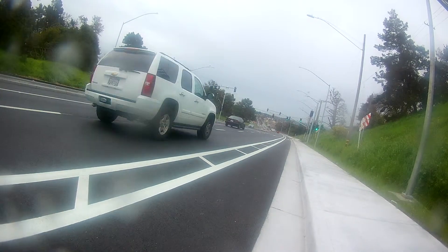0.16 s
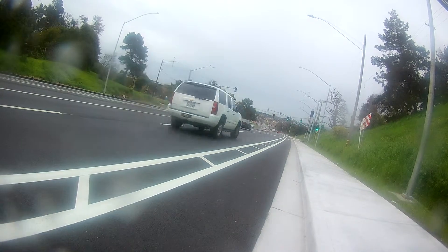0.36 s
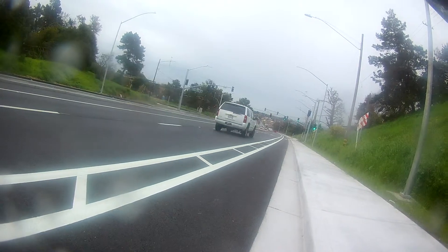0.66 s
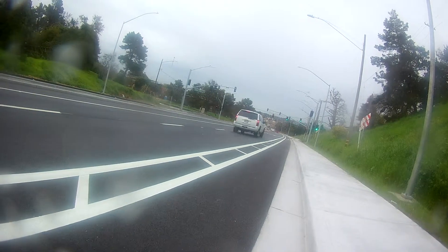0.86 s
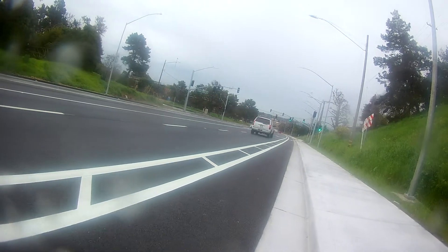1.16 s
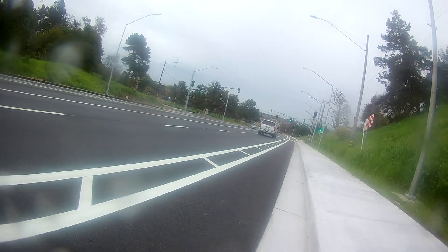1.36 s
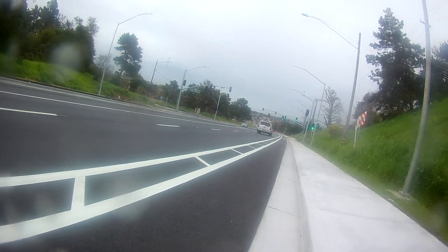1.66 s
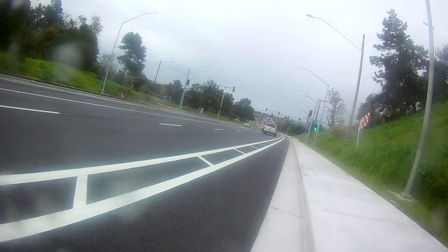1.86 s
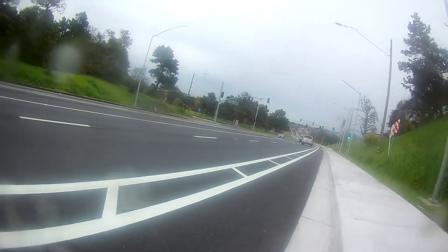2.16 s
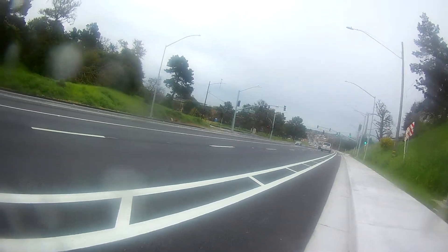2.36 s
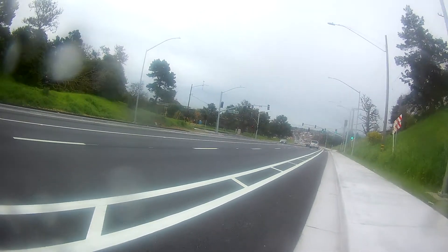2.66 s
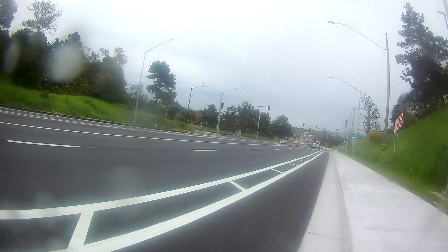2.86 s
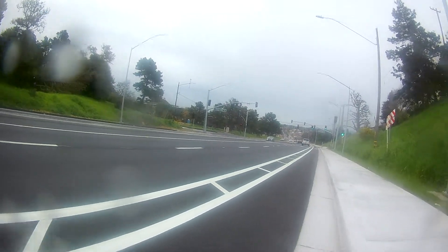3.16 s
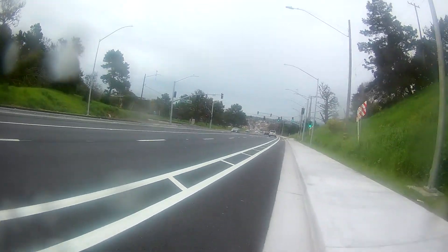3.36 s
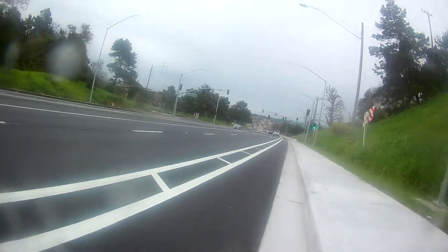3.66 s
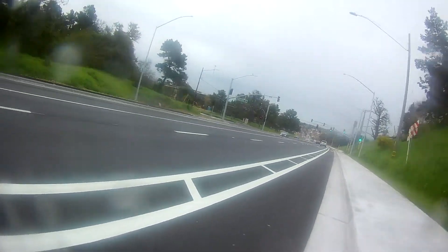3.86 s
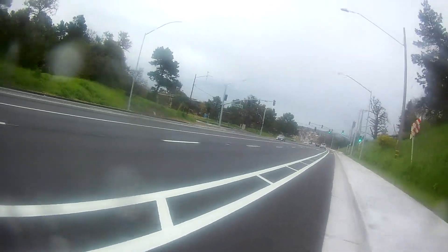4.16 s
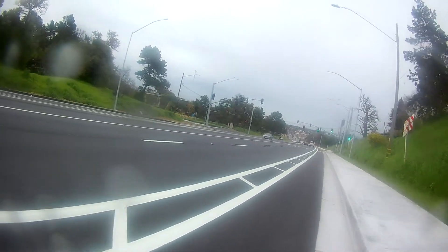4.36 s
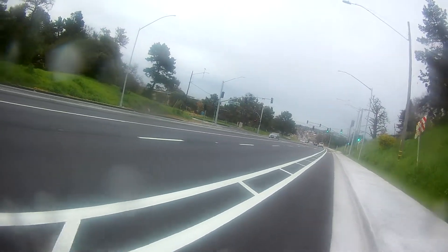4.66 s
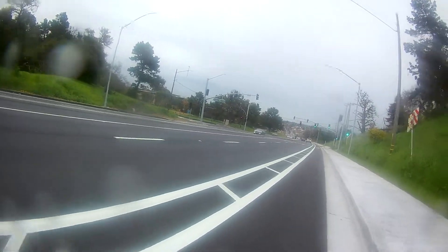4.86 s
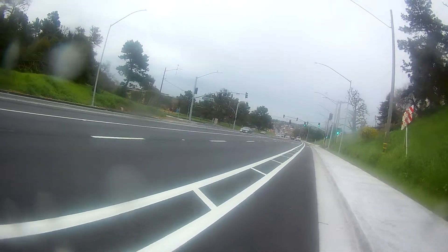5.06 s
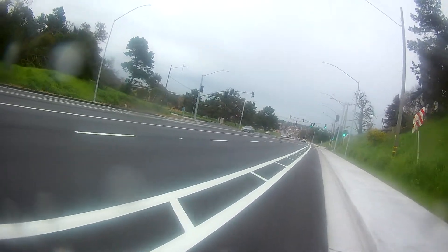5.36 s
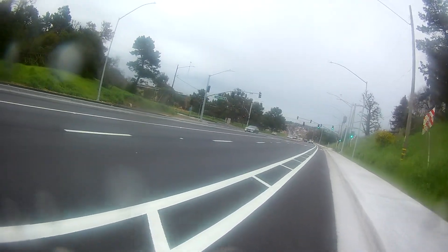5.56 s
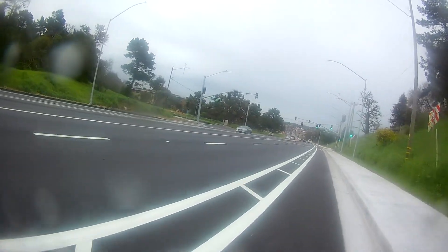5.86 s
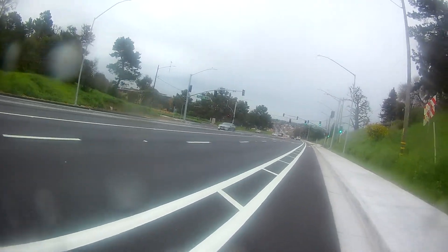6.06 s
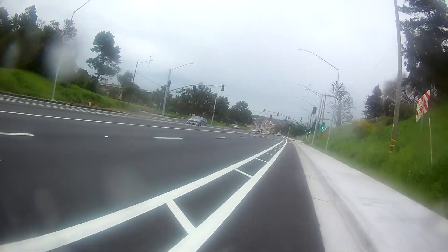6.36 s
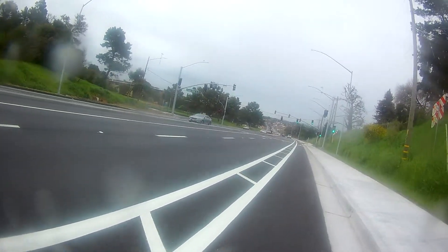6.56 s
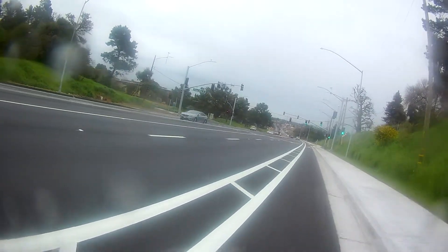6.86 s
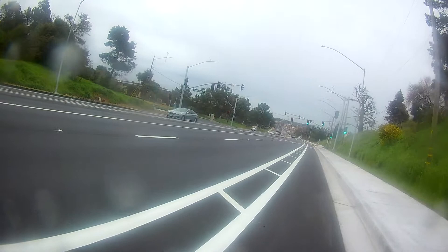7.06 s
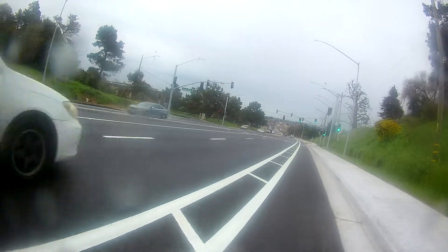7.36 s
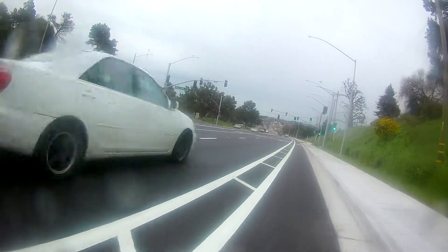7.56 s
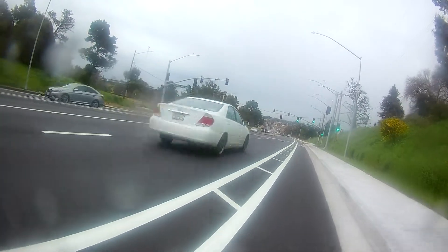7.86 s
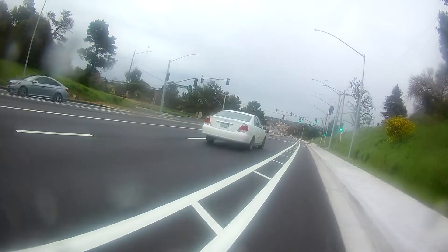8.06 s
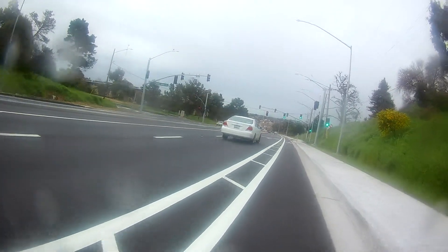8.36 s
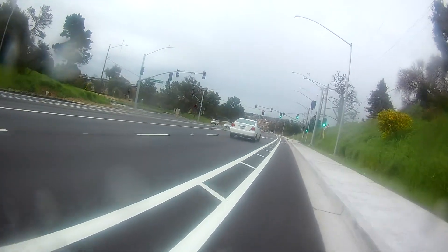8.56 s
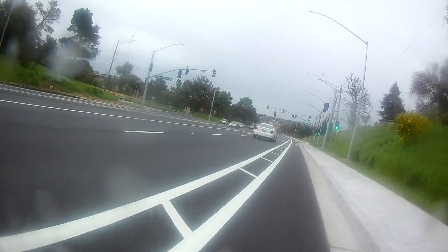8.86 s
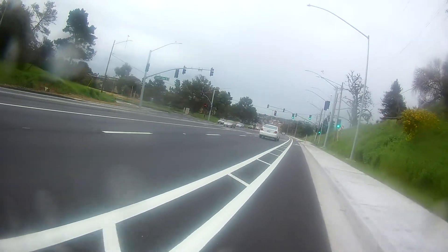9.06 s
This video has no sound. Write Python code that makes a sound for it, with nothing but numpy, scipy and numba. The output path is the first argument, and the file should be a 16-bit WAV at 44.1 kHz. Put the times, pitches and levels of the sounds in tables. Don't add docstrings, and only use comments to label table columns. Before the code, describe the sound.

Close, boxy microphone sealed in a plastic case on a bicycle. First the muffled hiss and roar of a passing car draws away. At about one and a half seconds a sharp clack dominates, followed by small knocks and rattles. Low frame rumble builds over rough road with buffeting wind; later another car's tyre whoosh swells, passes and recedes.

```python
import sys
import numpy as np
from scipy import signal
from scipy.fft import rfft, irfft, next_fast_len
from scipy.io import wavfile
from scipy.ndimage import uniform_filter1d
from numba import njit

SR = 44100
rng = np.random.default_rng(int(sys.argv[2]) if len(sys.argv) > 2 else 0)


def log_audio(samples):
    frames = np.atleast_2d(samples).T
    limited = np.clip(frames, -1, 1)
    pcm = np.round(limited * 32767).astype(np.int16)
    wavfile.write(sys.argv[1], SR, pcm)


def voltage_ratio(level):
    return 10 ** (np.asarray(level, float) / 20)


N = 405719
TIME = np.arange(N) / SR
SLOW = TIME[::64]


def level(x, db):
    return x * voltage_ratio(db) / np.sqrt(np.mean(x ** 2))


def curves(table):
    s, *columns = np.transpose(table)
    return [np.interp(SLOW, s, c) for c in columns]


def full(slow):
    return np.interp(TIME, SLOW, slow)


def walk(rate):
    hold = int(SR / rate)
    steps = np.repeat(rng.standard_normal(N // hold + 1), hold)
    return 1.3 * uniform_filter1d(uniform_filter1d(steps, hold), hold)[:N]


def coloured(spectrum):
    hz, db = np.transpose(spectrum)
    size = next_fast_len(N)
    log_hz = np.log(np.maximum(np.fft.rfftfreq(size, 1 / SR), 1))
    gain = voltage_ratio(np.interp(log_hz, np.log(hz), db, left=-99, right=-99))
    return level(irfft(rfft(rng.standard_normal(size)) * gain, size)[:N], 0)


@njit
def svf(x, hz, width):
    y, band, low = np.empty(len(x)), 0., 0.
    for i in range(len(x)):
        g, k = np.tan(np.pi * hz[i] / SR), width / hz[i]
        v = (band + g * (x[i] - low)) / (1 + g * (g + k))
        band, low, y[i] = 2 * v - band, low + 2 * g * v, k * v
    return y


def rings(modes, t, turn=0):
    hz, width, db = np.transpose(modes)[:, :, None]
    return voltage_ratio(db) * np.sin(2 * np.pi * (hz * t + turn)) * np.exp(-np.pi * width * t)


def onset(t, rise):
    return np.sin(np.pi / 2 * np.clip(t / np.clip(rise, .001, .03), 0, 1)) ** 2


def add(out, s, x, db):
    i = int(s * SR)
    x = x[:N - i]
    out[i:i + len(x)] += x * voltage_ratio(db) / np.abs(x).max()


# (time alongside [s], level [dB], closing speed [m/s], lane distance [m])
CARS = [
    (-.17, 2, 19.6, 3.6),
    (7.25, -0.4, 16.17, 3.36),
]


def passing(db, ahead_m, coming, going, shadow_db, colour_db=(0, 0), fade_db=0.75):
    power = 0
    for (s, car_db, speed, lane), tint_db in zip(CARS, colour_db):
        along = speed * (SLOW - s)
        decades = np.log10(np.hypot((along - ahead_m) / lane, 1))
        shadow = (1 + np.tanh((along - 7.6) / 1.3)) / 2
        loss_db = np.where(along < ahead_m, coming, going) * decades
        loss_db = loss_db + shadow_db * shadow + fade_db * np.maximum(along, 0)
        power = power + voltage_ratio(db + car_db + tint_db - loss_db) ** 2
    return np.sqrt(power)


# (frequency [Hz], level [dB per Hz])
ROAR_SPECTRUM = [(150, -33), (250, -6.5), (346, -8), (424, -9), (488, -15), (571, -6.5), (639, -9.5),
                 (821, -7), (1080, -5), (1380, 1.5), (1500, 5.5), (1790, 0), (2000, -8), (2180, -15.5),
                 (2300, -50), (2990, -52), (5060, -120)]
EDGE_SPECTRUM = [(1500, -28), (2000, -9), (2150, -2), (2320, 2), (2450, -2.5), (2600, -7), (2850, -12.5),
                 (2960, -22), (3300, -41)]
HISS_SPECTRUM = [(1590, -34), (2700, -6), (2870, -5), (3010, -4.5), (3210, 3.5), (3450, 0.5), (3560, -3),
                 (3800, 0), (3990, -1), (4210, -0.5), (4380, -25), (4600, -22), (5980, -51), (10100, -120)]
SPRAY_SPECTRUM = [(3600, -34), (4150, -11), (4350, -3), (4650, -2.5), (5000, -6.5), (5250, -13),
                  (5500, -14), (6500, -46)]
MIST_SPECTRUM = [(4700, -30), (5050, 1), (5500, -6), (5990, -1), (6300, -7), (6750, -1), (7300, -6),
                 (9000, -39)]
LIP_SPECTRUM = [(1700, -31), (1850, -1.5), (1960, 3), (2060, 0), (2150, -18), (2300, -42)]
# (level alongside [dB], loudest distance ahead [m], loss coming [dB per decade],
# loss going [dB per decade], loss in the shadow of the lens port [dB])
WALL_LAWS = [
    (-39.5, 0.7, 22.5, 8.5, 5.5),
    (-55.5, 2.5, 35, 12, 9.5),
    (-61.5, 5.5, 27.5, 12, -1),
    (-75.5, 2.3, 24.5, 12, 1),
    (-85, 5, 14.5, 8, 0),
    (-52.5, -2.5, 21, 16, 5),
]
# (roar [dB], edge [dB], hiss [dB], spray [dB], mist [dB], lip [dB])
CAR_TINT = [
    (0, 2, 0.1, 3, 5.5, -1),
    (-0.046, 1.5, 1, 0.11, 2, -0.5),
]
WALL_FADE = [0.44, 0.47, 0.22, 0.47, .4, .4]
FAR_LEVELS = [-64, -84.5, -81.5, -93, -99, -78]
# (time [s], swell [dB], swell of the wet hiss [dB])
FAR_SWELLS = [(0, -7, 0), (1.0, 2.5, 6), (1.8, -4, 4.5), (2.2, 3.5, -1), (2.7, 6, 1), (3.2, 4.5, 1),
              (3.6, 0.5, 0.5), (4.0, 1.5, 1.2), (4.4, -2, 2), (5.1, -5, 2.5), (6.0, -15, -1), (8, -0.5, -3),
              (9.2, 5, 6)]
FAR_SHARES = [
    (1.07, 0.043),
    (0.12, 0.8),
    (0.041, 1.0),
    (0.1, .8),
    (0.078, .5),
    (1.2, 0),
]


def wall_leak():
    swell = .4 * walk(3.3)
    far_db = np.array(FAR_SHARES) @ curves(FAR_SWELLS) + np.c_[FAR_LEVELS]
    walls = ROAR_SPECTRUM, EDGE_SPECTRUM, HISS_SPECTRUM, SPRAY_SPECTRUM, MIST_SPECTRUM, LIP_SPECTRUM
    roar = np.zeros(N)
    for wall, law, tint, fade, db in zip(walls, WALL_LAWS, np.transpose(CAR_TINT), WALL_FADE, far_db):
        near_and_far = np.hypot(passing(*law, tint, fade), voltage_ratio(db))
        roar += coloured(wall) * full(near_and_far) * voltage_ratio(swell + 0.96 * walk(20))
    return roar


# (time [s], centre [Hz], depth [0-1])
ROAD_MIRROR = [(0, 1300, 0.53), (1.0, 1420, 0.5), (2.2, 1510, 0.54), (2.5, 1570, 1), (2.9, 1480, 0.8),
               (3.3, 1340, 0.4), (3.7, 1210, 0.2), (4.3, 1300, 0.1), (5.4, 1290, 0.7), (6.2, 1150, 0.3),
               (7.0, 1140, 0.5), (8.0, 1240, 0.64), (9.2, 1350, 1)]


def mirrored(roar):
    hz, depth = map(full, curves(ROAD_MIRROR))
    return roar - np.clip(depth, 0, 1) * svf(roar, hz, 370.0)


# (level alongside [dB], loudest distance ahead [m], loss coming [dB per decade],
# loss going [dB per decade], loss in the shadow [dB])
TREAD_LAW = (-50, -3, 22.5, 10, 12.5)


def tread():
    width_hz, turn_m = 167.0, 6.2
    s, _, speed, _ = CARS[-1]
    along = np.where(SLOW < s / 3, turn_m, speed * (SLOW - s))
    hz = full(1752 * (1 - 0.078 * along / np.hypot(along, turn_m)))
    whine = svf(svf(rng.standard_normal(N), hz, width_hz), hz, 1.6 * width_hz)
    return level(whine, 0) * full(passing(*TREAD_LAW))


# (frequency [Hz], width [Hz], level [dB])
WALL_MODES = [(1086, 85, -6), (1786, 54, 0), (3180, 170, -12.5), (3840, 80, -11), (4110, 90, -5.5)]


def traffic():
    roar = mirrored(wall_leak()) + tread()
    ringing = sum(voltage_ratio(db) * svf(roar, np.full(N, 1. * hz), 1. * width) for hz, width, db in WALL_MODES)
    return roar + ringing


# (frequency [Hz], level [dB per Hz])
SEAM_SPECTRUM = [(2400, -32), (2600, -12), (2780, -2), (2900, -11), (3050, -3), (3180, -11), (3350, -7),
                 (3500, -31), (4200, -32), (4380, -17), (4550, -15), (4800, -40)]
# (time [s], level [dB])
SEAM_LEVEL = [(0, -96.5), (1.8, -93), (2.5, -85), (4, -84), (6, -82.5), (6.9, -78), (7.2, -69), (7.45, -73),
              (7.6, -90), (9.2, -90)]


def seam():
    return coloured(SEAM_SPECTRUM) * voltage_ratio(full(curves(SEAM_LEVEL)[0]) + .7 * walk(12))


# (time [s], pace [0-1], coarseness of the surface [dB])
RIDE = [(0, 0.17, 6.5), (.5, 0, 0.5), (1.0, 0.1, -1), (1.5, 0.6, 1.5), (1.85, 0.16, -1.5), (2.2, 0.46, 2.5),
        (2.6, 0.08, -2), (3.1, 0.61, -1), (3.6, 0.59, -1.5), (4.0, 0.68, 1), (4.2, 0.91, 2), (5.0, 0.83, 1),
        (5.5, 0.87, 1.5), (6.5, 0.94, 3.5), (7.1, 0.96, 3), (7.6, 0.88, 5.5), (8.2, 1, 6.5), (8.7, 1, 7.5),
        (9.2, 0.99, 8)]
# (level at rest [dB], gain at full pace [dB], level from a car alongside [dB],
# share of a bump [1], share of coarseness [1])
PART_SHAKE = [
    (-73.5, 28.5, -83.5, 0.64, -0.1),
    (-67.5, 17, -56, 0.087, 0.14),
    (-71.5, 16, -74, 0.39, 0.5),
    (-61.5, 4.5, -51.5, 0.095, 0.93),
]
# (time [s], swell [dB], length [s], extra on the bars [dB])
ROAD_BUMPS = [(2.153, -8, 0.09, 8.5), (2.956, 13, 0.03, -6), (3.162, 6.5, 0.07, 3.5), (3.48, 3, 0.056, 5.5),
              (3.81, 19, 0.22, -4.5), (4.152, 3, 0.057, 10), (5.027, 12, 0.031, -1),
              (5.244, 15.5, 0.03, -4.5), (5.463, 10, 0.097, -1.5), (5.872, 12.5, 0.043, -6),
              (6.288, 13, 0.052, -5.5), (6.58, -3, 0.15, 0), (6.857, 9, 0.043, 0.5), (7.05, -1, 0.084, 2),
              (7.98, 5, 0.029, -6), (8.482, 7, 0.026, -4.5), (8.863, 4, 0.064, -2.5), (9.053, -5.5, 0.2, 6)]


def shaking():
    s, db, length, bars_db = np.transpose(ROAD_BUMPS)[:, :, None]
    patch = np.exp(-((SLOW - s) / length) ** 2)
    swell, bars_extra = (db * patch).sum(axis=0), (bars_db * patch).sum(axis=0)
    pace, coarse = curves(RIDE)
    rumble = passing(0, 6.9, 45, 5.9, 1.2)
    gains = []
    for rest, span, car, bump, grit in PART_SHAKE:
        road = voltage_ratio(rest + span * pace + bump * swell + grit * coarse)
        gains.append(np.hypot(road, voltage_ratio(car) * rumble))
    gains[2] = gains[2] * voltage_ratio(bars_extra)
    return [full(g) for g in gains]


def shaken(modes, grain, flicker_db, rate):
    t = TIME[:SR // 6]
    soft = 1 - np.exp(-t / 0.0007)
    uptake = np.array(modes)[:, 1:2] ** 0.16
    out = np.zeros(N)
    for push in rings(modes, t) * soft * uptake:
        flicker = voltage_ratio(flicker_db * walk(rate))
        out += flicker * signal.oaconvolve(grain * rng.standard_normal(N), push)[:N]
    return level(out, 0)


# (time [s], frequency [Hz])
FRAME_SWAY = [(0, 75.5), (3.55, 78), (3.65, 98), (3.92, 98), (4.02, 74), (5.3, 75.7), (5.5, 81),
              (6.2, 76.3), (8, 82.6), (9.2, 73)]
# (frequency [Hz], width [Hz], level [dB])
FORK_MODES = [
    (128.6, 35, -1.5),
    (156.9, 15.6, -1.5),
]
BARS_MODES = [
    (180, 24, -16),
    (218, 14.3, 0.5),
    (251, 18, -6),
]
CASE_MODES = [(386, 29.7, -6), (476, 37, -9), (514.3, 45.4, -3.5), (625.3, 9.8, -8.5), (689, 69, 1.5),
              (797, 19.4, -9), (907, 146, 5), (1080, 79, -2.5), (1318, 78, -6), (1550, 27, -17.5),
              (1860, 68, -20), (2170, 190, -26)]
# (time [s], pressure on the lid [dB])
WIND_PRESSURE = [(0, -74), (1, -74), (1.8, -77), (2.1, -70), (2.6, -73), (2.95, -59.5), (3.3, -69.5),
                 (4.3, -60.5), (4.6, -66), (4.9, -78), (5.3, -78), (5.8, -73), (6.3, -60.5), (6.8, -72),
                 (7.6, -64), (8.6, -64), (9.2, -64)]


def rolling():
    grain = voltage_ratio(1.03 * walk(18) + 0.96 * walk(90))
    sway_hz = full(curves(FRAME_SWAY)[0])
    sway = svf(svf(grain * rng.standard_normal(N), sway_hz, 35.0), sway_hz, 49.0)
    fork = shaken(FORK_MODES, grain, flicker_db=2.5, rate=4.3)
    bars = shaken(BARS_MODES, grain, flicker_db=0.0, rate=6)
    buzz = shaken(CASE_MODES, grain, flicker_db=-0.1, rate=11)
    parts = level(sway, 0), fork, bars, buzz
    ride = sum(part * gain for part, gain in zip(parts, shaking()))
    wind = coloured([(5, -4.0), (16, -0.5), (27, -3), (40, -12.0), (70, -15.5), (130, -17.5), (300, -45.0)])
    return ride + wind * voltage_ratio(full(curves(WIND_PRESSURE)[0]) + 9.0 + 1.5 * walk(10))


# (time [s], peak level [dB], frequency [Hz], rise [s], ring down to -60 dB [s])
SOFT_NUDGES = [(1.108, -34, 204, 0.0047, 0.051), (1.158, -45, 1890, .002, .02),
               (1.1645, -50, 2170, .002, .015), (1.425, -24.5, 560, 0.0024, 0.053),
               (2.008, -40, 470, 0.0026, .08), (2.152, -40, 470, .005, .12), (2.254, -30, 693, .006, .04),
               (2.3, -46.5, 640, .006, 0.12), (2.689, -45, 692, .006, 0.077), (2.734, -41, 24, 0.0089, .4),
               (2.832, -32, 700, .011, .03), (2.85, -40.5, 578, 0.0047, 0.057),
               (2.862, -45, 646, .006, 0.11), (3.181, -40, 648, .001, .03), (4.1, -46, 690, 0.0089, 0.11),
               (4.125, -35, 518, 0.005, .05), (4.143, -39, 202, 0.0069, .08),
               (4.159, -36, 660, 0.0052, .05), (4.162, -39, 229, .008, 0.11), (4.176, -41, 630, 0.0088, .1),
               (8.929, -38, 900, .001, .03), (2.02, -31, 77, .016, .13), (2.032, -38, 470, .006, .06),
               (2.036, -43, 1090, .008, .04), (2.2, -45, 1130, .002, .04), (2.2465, -27, 1130, .004, .025),
               (2.495, -45, 180, .008, .1), (2.686, -41, 1560, .003, .03), (2.79, -44, 1050, .002, .02),
               (4.1218, -33, 200, .006, .05), (4.124, -39, 1400, .002, .02), (4.395, -43, 900, .001, .02),
               (9.154, -35, 800, .002, .025), (3.131, -41, 690, .006, .05)]


def nudges():
    out, t = np.zeros(N), TIME[:SR // 3]
    for s, db, hz, rise, ring in SOFT_NUDGES:
        swing = np.sin(2 * np.pi * hz * t) * onset(t, rise)
        add(out, s, swing * voltage_ratio(-60 * t / max(ring, .005)), db)
    return out


# (time [s], peak level [dB], top part [dB], decay [s])
CONTACT_CRACKS = [(1.11, -37.5, -23, 0.0099), (1.1365, -45, -23, 0.007), (1.164, -45, -6, .005),
                  (1.3674, -32, -30, 0.0072), (1.4226, -16.5, -15, 0.0034), (1.438, -31, -29, 0.006),
                  (1.755, -48, -12, 0.0082), (1.9495, -46, -15, .0054), (1.97, -47, -13, 0.0061),
                  (2.01, -49, -30, .0054), (2.0214, -48, -9, 0.022), (2.148, -39.5, -17, .0054),
                  (2.1997, -44, -32, 0.0047), (2.2452, -26.5, -35, 0.0083), (2.6847, -43.5, -36, 0.013),
                  (2.838, -51, -31, .0054), (3.213, -47, -30, 0.005), (3.2734, -52, -26, 0.006),
                  (4.127, -44, -21, .006), (4.267, -50, -30, .004), (4.3945, -47, -30, 0.0061),
                  (9.1552, -40, -30, 0.0059)]
# (time [s], peak level [dB], top part [dB], rise [s], decay [s])
SLIDE = (1.409, -28.5, -25, 0.012, .003)
# (frequency [Hz], level [dB per Hz])
GRIT_BODY = [(470, -69), (800, 11), (1190, 2), (1470, 6), (1770, 2), (1900, -7), (2130, -20), (2500, -29),
             (3250, -50), (5500, -120)]
GRIT_TOP = [(1350, -37), (2300, -3), (2640, -8.5), (3040, -2), (3490, -6.5), (4510, -13), (5120, -24),
            (6000, -21), (6680, -27), (7940, -40), (9670, -34), (14000, -55)]


def cracks():
    out, t = np.zeros(N), TIME[:SR // 10]
    body, top = coloured(GRIT_BODY), coloured(GRIT_TOP)
    rows = [(s, db, top_db, .002, decay) for s, db, top_db, decay in CONTACT_CRACKS]
    for s, db, top_db, rise, decay in rows + [SLIDE]:
        i = min(int(s * SR), N - len(t))
        grit = body[i:i + len(t)] + voltage_ratio(top_db) * top[i:i + len(t)]
        dying = np.exp(-np.maximum(t - rise, 0) / max(decay, .001))
        add(out, s - .001, grit * onset(t, rise) * dying, db)
    return out


# (time [s], peak level [dB], low panel [Hz], high panel [Hz], high part [dB])
CASE_KNOCKS = [(1.111, -37.5, 366, 1080, -2), (1.1365, -38.5, 672, 1060, -12), (1.165, -43, 830, 1850, 0),
               (1.366, -36, 820, 1080, -6), (1.4225, -27, 664, 1754, -1), (1.431, -25, 1060, 1620, -10),
               (1.4395, -29, 408, 1460, -10.5), (1.754, -44.5, 450, 1670, -3), (1.967, -45, 476, 1080, 0),
               (2.008, -48, 494, 1350, -15), (2.024, -33.5, 480, 1106, -7.5), (2.148, -40, 476, 1770, -8),
               (2.248, -26.5, 697, 1095, -2), (2.2465, -32, 1460, 1600, -10), (2.686, -37.5, 700, 895, 0),
               (2.688, -38, 1450, 1530, -3), (2.791, -43.5, 900, 1080, -11), (2.838, -39, 900, 1600, -12),
               (3.14, -46, 673, 910, -14), (3.197, -52, 1480, 1730, -2), (3.212, -49, 740, 1550, 7),
               (3.274, -46.5, 610, 1550, 9), (4.127, -24, 905, 920, -1), (4.131, -23, 600, 954, -2),
               (4.149, -35, 700, 950, -11), (4.137, -36.5, 690, 910, -13), (6.068, -47, 476, 1860, -13),
               (6.837, -32, 484, 1550, -6), (9.154, -28, 456, 1104, -8.5)]
# (time [s], peak level [dB], low panel [Hz])
MOUNT_RATTLES = [(1.928, -46, 463), (1.95, -42, 800), (2.044, -44, 471), (2.13, -43, 1080),
                 (2.162, -44, 473), (2.199, -52, 476), (2.27, -37, 495), (2.293, -45, 500),
                 (2.716, -47, 660), (2.812, -45, 660), (2.852, -47, 610), (2.865, -45, 650),
                 (2.905, -51, 710), (3.158, -49, 640), (1.53, -53, 820), (1.59, -49, 696),
                 (3.098, -50, 604), (3.181, -43.5, 630), (4.098, -42, 1000), (4.168, -43, 900),
                 (4.207, -44.5, 760), (4.264, -46, 810), (4.394, -44, 890), (4.286, -52, 752),
                 (2.873, -51, 644), (2.306, -56, 640), (5.886, -43.5, 614), (8.929, -40, 625),
                 (4.85, -43.5, 910), (4.72, -48, 1080), (5.51, -48, 1000)]


def knocks():
    out, t = np.zeros(N), TIME[:SR // 4]
    blows = CASE_KNOCKS + [(s, db, hz, 1060, -8) for s, db, hz in MOUNT_RATTLES]
    turns = rng.random((len(blows), len(CASE_MODES) + 4, 1))
    turns[:, len(CASE_MODES):] = 0
    for (s, db, low_hz, high_hz, high_db), turn in zip(blows, turns):
        dull_db = max(-6 - high_db, 0)
        case = [(hz, width + 6, mode_db - 6.0 - .15 * dull_db + (hz > 850) * high_db)
                for hz, width, mode_db in CASE_MODES]
        panels = [(low_hz, low_hz / 17, 0), (high_hz, 70, high_db + 10.5)]
        clamp = [(630, 9.5, 0.58 * db - 7.5), (820, 3.9, 1.0 * db - 24)]
        ringing = rings(case + panels + clamp, t, turn).sum(axis=0)
        add(out, s - .001, ringing * onset(t, 0.0029 - 0.03 * dull_db), db)
    return out


# (time [s], peak level [dB], frame [Hz], bars [Hz], bars part [dB])
FRAME_THUMPS = [(1.115, -39, 118, 171, -5), (1.168, -38.5, 78.5, 161, -2.5), (1.365, -37.5, 119, 223, -0.5),
                (1.375, -34, 119, 155, 2), (1.425, -27.5, 99, 125, -6.5), (1.4325, -14.5, 127.5, 151, -6),
                (1.451, -30, 118, 198, 2), (1.482, -37, 99, 140, -9.5), (2.0345, -36, 77, 150, 0),
                (2.148, -48, 120, 139, -6.5), (2.247, -40, 88.8, 233, 8), (2.684, -36, 73.5, 207, -9.5),
                (2.705, -34.5, 68, 218, -7.5), (2.846, -41, 113.7, 224, -2.5),
                (3.15, -42.5, 78.1, 219, -11.5), (4.1268, -33, 56.5, 205, -3), (4.157, -45, 68, 217, -17),
                (6.237, -36, 61.6, 119, -2), (6.271, -42, 67.3, 132, -21), (6.829, -44, 64.6, 220, -9),
                (8.467, -31.5, 88, 155, -13), (9.166, -33.5, 69.6, 195, -6.5)]


def thumps():
    out, t = np.zeros(N), TIME[:SR // 2]
    for s, db, frame_hz, bars_hz, bars_db in FRAME_THUMPS:
        t60 = 0.11 * (100 / frame_hz) ** 0.93
        width = np.log(1000) / np.pi / t60
        swing = [(frame_hz, 0.67 * width, -14.0 - 1.95 * bars_db), (bars_hz, width, 0)]
        add(out, s, rings(swing, t).sum(axis=0) * onset(t, 0.0048), db)
    return signal.sosfilt(signal.butter(2, 45, "high", fs=SR, output="sos"), out)


# (time [s], peak level [dB])
SLAM_BLOWS = [
    (1.4214, -18),
    (1.4243, -7.5),
    (1.4269, -11.5),
]
# (frequency [Hz], width [Hz], level [dB])
SHELL_MODES = [(640, 150, 1.5), (1082, 193, 2.5), (1304, 80, -9.5), (1720, 135, -1), (2200, 100, -16),
               (2930, 220, -20), (3300, 200, -28), (3900, 140, -29), (4100, 120, -26.5), (4570, 200, -22),
               (5430, 220, -44), (6300, 200, -40), (6800, 150, -38.5), (9000, 2500, -45)]
CLAMP_MODES = [(630, 7.2, 7), (820, 2.7, -13)]


def slam():
    out, t = np.zeros(N), TIME[:SR // 2]
    for s, db in SLAM_BLOWS:
        add(out, s, rings(SHELL_MODES, t).sum(axis=0) * onset(t, 0.0014), db)
    add(out, SLAM_BLOWS[1][0], rings(CLAMP_MODES, t).sum(axis=0) * onset(t, 0.0027), -27)
    return out


def scene():
    outside = traffic() + seam()
    blows = nudges() + cracks() + knocks() + thumps() + slam()
    return (outside + rolling() + blows)[None]


def roll_off(x):
    return signal.sosfilt(signal.butter(12, 15900, fs=SR, output="sos"), x)


# (frequency [Hz], level [dB per Hz])
PREAMP_HISS = [(2940, -23), (5000, 0), (6210, -0.5), (6960, -2), (7850, -1.5), (8730, -2), (11100, -2.5),
               (15200, 0.5), (15800, 3)]


def record(dry):
    mix = dry + voltage_ratio(-80.5) * coloured(PREAMP_HISS)
    return roll_off(mix)


dry = scene()
out = record(dry)
log_audio(out)
```